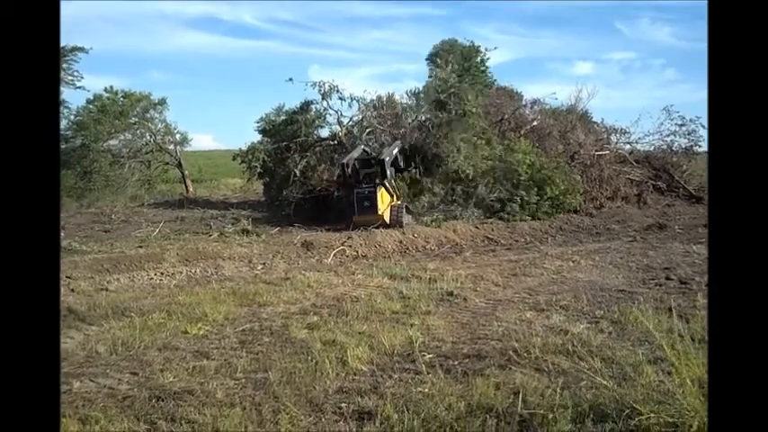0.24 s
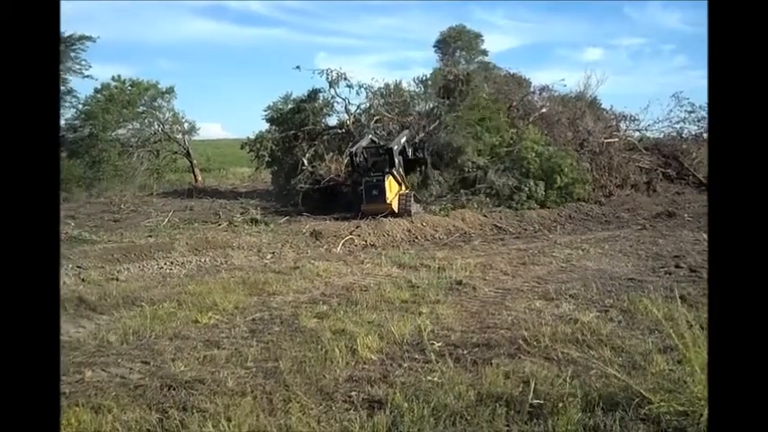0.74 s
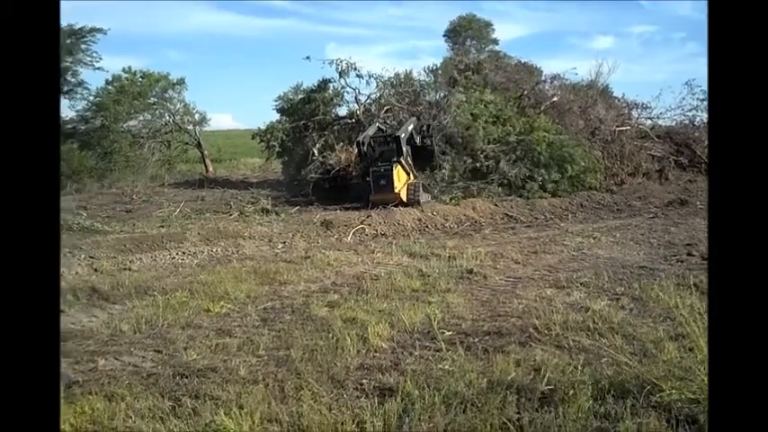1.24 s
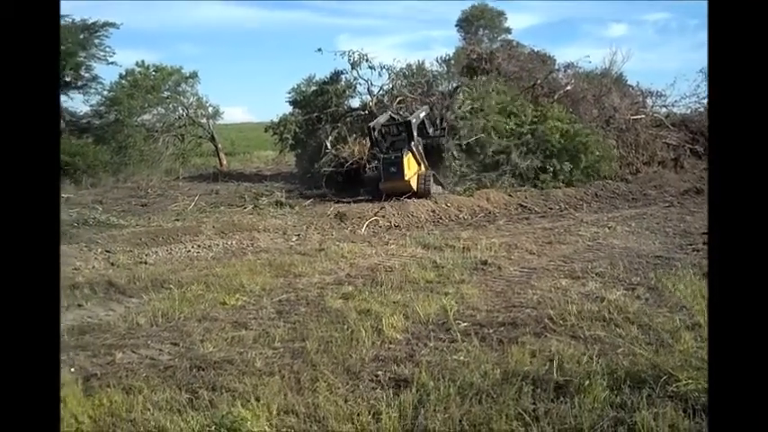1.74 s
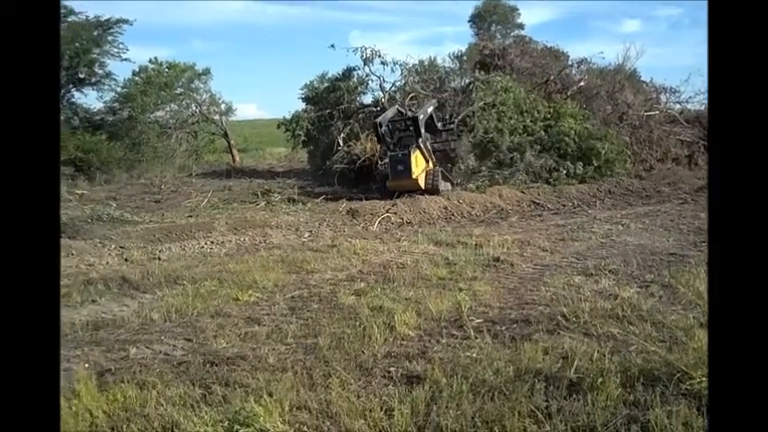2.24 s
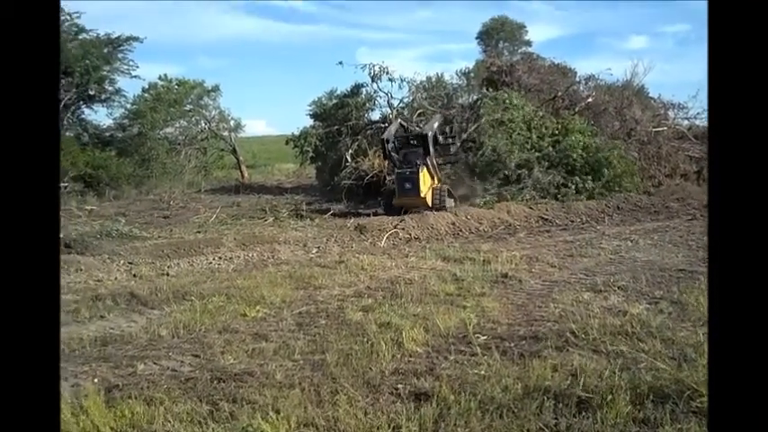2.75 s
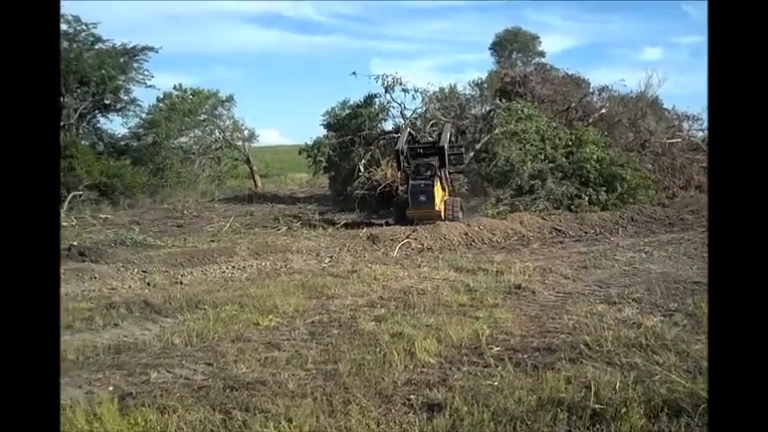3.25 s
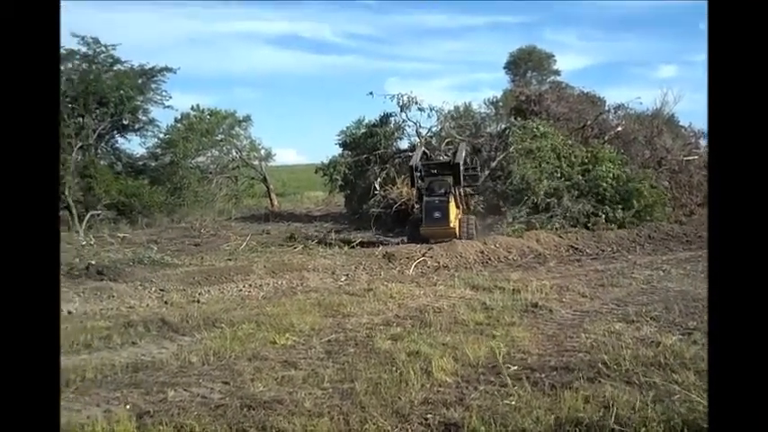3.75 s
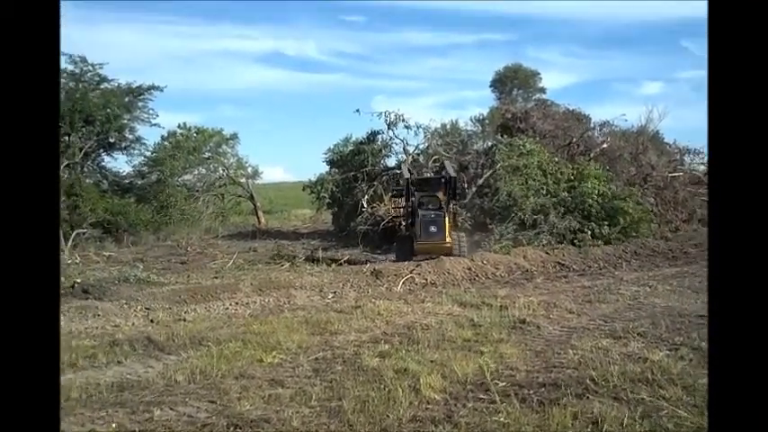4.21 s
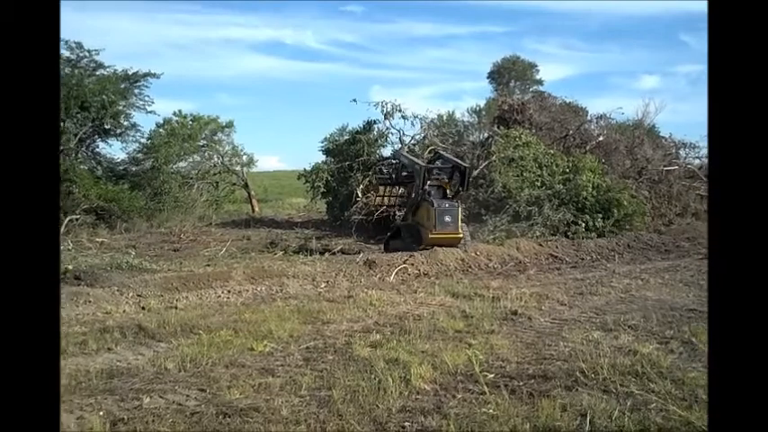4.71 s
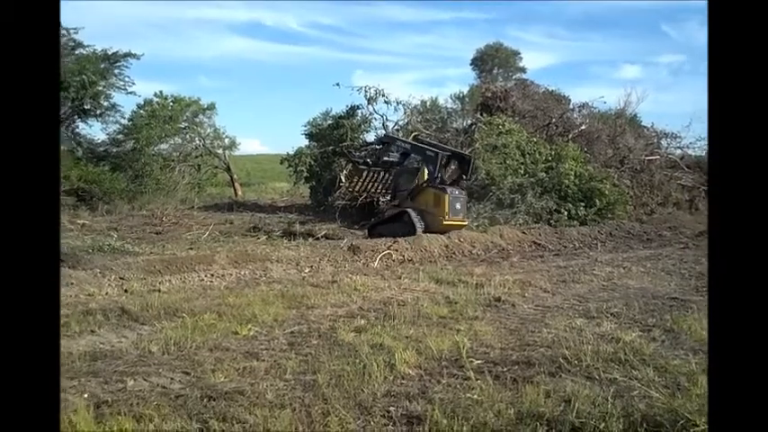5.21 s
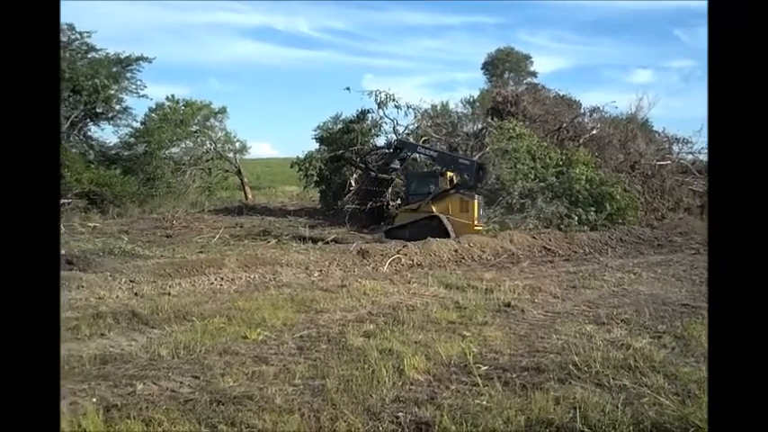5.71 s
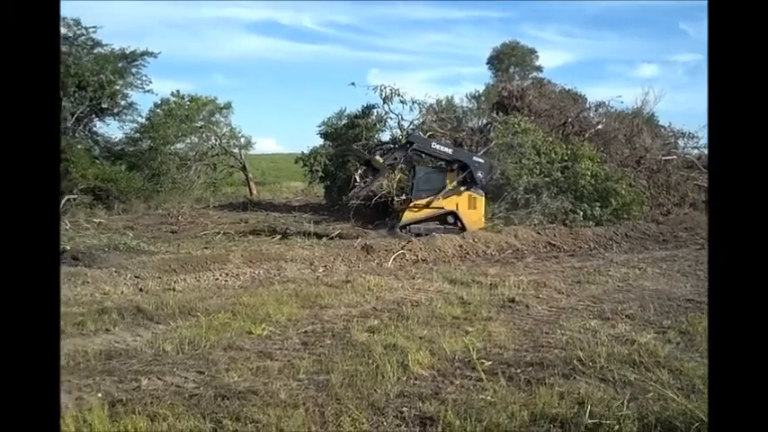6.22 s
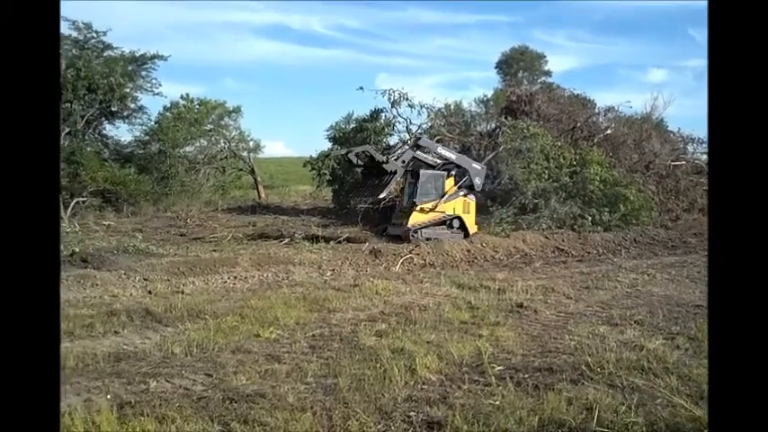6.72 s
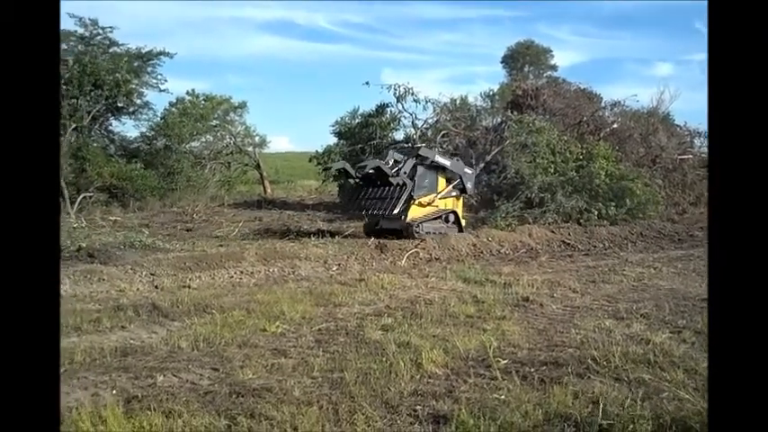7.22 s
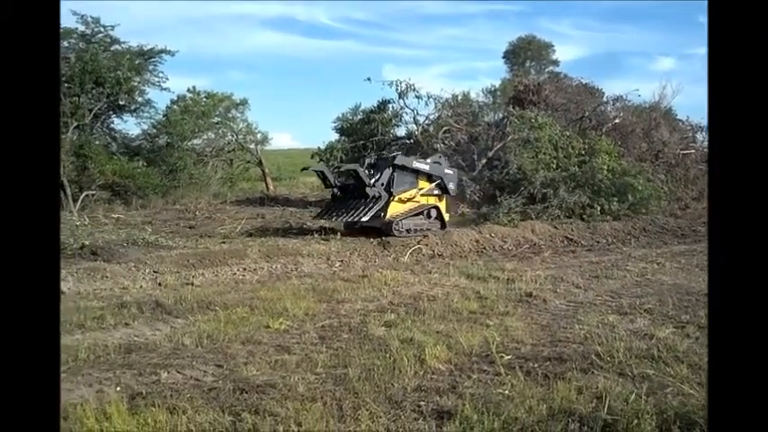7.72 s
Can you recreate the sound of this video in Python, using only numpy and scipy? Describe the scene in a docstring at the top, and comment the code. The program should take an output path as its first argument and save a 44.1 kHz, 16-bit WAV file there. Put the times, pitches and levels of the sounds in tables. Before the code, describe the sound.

Wind thumps the microphone while a distant tracked machine revs, growls and clatters beside brush, its bright roar dulling near the end as it turns.

```python
"""Diesel tracked loader at work beside a brush pile, some way off in an open field; it turns side-on.
Engine: exhaust orders follow a firing rate that sags and recovers; a coloured roar throbs with the firings.
Also: fan tones, ringing tracks, frame knocks, hydraulic whine, snapping twigs, thin turbo whistle.
Wind thuds in opposite polarity left and right, with brief clicks; heavier gusts duck the automatic gain.
The machine is widened by delay and phase turn, its bright roar also by diffuse echoes."""
import sys
import numpy as np
from scipy import signal
from scipy.fft import rfft, irfft
from scipy.io import wavfile
from scipy.ndimage import uniform_filter1d

SR = 44100
rng = np.random.default_rng(int(sys.argv[2]) if len(sys.argv) > 2 else 0)


def store_wav(level_fs):
    """Save 16-bit WAV to argv[1]."""
    pcm = np.round(np.clip(np.atleast_2d(level_fs), -1, 1) * 32767)
    wavfile.write(sys.argv[1], SR, pcm.T.astype(np.int16))


N = 351024
TIME = np.arange(N) / SR
FREQS = np.maximum(np.arange(N // 2 + 1) * SR / N, 1)

# wind strength, relative: t/s, level/dB
WIND = [(0, -38), (.9, -48), (1.8, -30.5), (2.35, -45.5), (3.9, -28), (4.7, -39), (5.1, -30), (6.1, -31),
        (6.6, -32), (7.7, -29)]
# strongest eddies: t/s, peak/dB, pitch f/Hz
BUFFETS = [(.026, -17, 193), (.132, -17.5, 164), (0.186, -21, 124), (0.21, -19, 177), (0.345, -21, 145),
           (0.369, -18, 150), (0.441, -19, 130), (0.5322, -4, 161), (0.651, -24, 150), (.932, -29, 150),
           (1.414, -22, 150), (1.728, -5, 148), (1.78, -4, 165), (1.868, -11, 210), (1.906, -5, 125),
           (1.959, -10.5, 149), (2.546, -10.5, 107), (2.691, -17, 140), (3.01, -12, 140), (3.19, -5.5, 109),
           (3.408, -5, 130), (3.506, -8, 115), (5.07, -3.5, 190), (5.261, -7, 128), (5.279, -7, 185),
           (5.51, -8, 150), (5.588, -15, 150), (5.999, -10, 129), (6.062, -6, 140), (6.121, -6, 180),
           (6.143, -5, 122), (6.279, 3.5, 145), (6.344, 1.5, 160), (6.38, -9, 185), (6.904, -14, 137),
           (7.159, -18, 140), (7.434, -18, 150), (7.598, -14, 190), (7.633, -14, 170), (7.926, -15, 150)]
# short windowed tones, clicks like handling taps early on, wind flutter later:
# t/s, envelope peak/dB, pitch f/Hz, length/s
SHORT_TONES = [(.026, -34, 800, 0.00077), (.130, -31.5, 1400, .0004), (.131, -21.5, 543, .0009),
               (.209, -34, 645, 0.00097), (0.371, -28, 500, 0.00073), (1.778, -10, 453, 0.0016),
               (1.905, -18, 430, 0.0012), (6.141, -10, 430, 0.0025), (6.279, -14, 446, 0.0019)]
# gusts that overload the input: t/s, peak/dB re full scale
GUSTS = [(1.76, 3), (1.93, 3), (3.216, 4.5), (3.539, 5.5), (5.3, 2), (6.025, 5), (6.17, 7), (6.309, 12.5)]
# stereo widening: f/Hz, left phase lead beyond the plain delay/rad, left minus right level/dB
STEREO = [(101, 2.01, 5), (174, 0.54, 6.5), (344, 0.094, 4.5), (491, 0.48, 4), (572, 2.45, 7.5),
          (616, 3.32, -1), (874, 4.14, 1), (1060, 4.08, 1), (1430, 3.46, 0), (1860, 2.64, -1.5),
          (2576, 3.32, -5.5), (3060, 2.95, 6.5), (4150, 3.25, 0.5), (16000, 3.16, -2.5)]
# branches giving way: t/s, level/dB, length/s
BRUSH = [(1.608, -30, 0.018), (5.76, -34.5, 0.036), (7.53, -58, .014)]
# turbo whistle: t/s, centre f/Hz, relative amplitude
TURBO = [(7.25, 14000, 0.05), (7.35, 14400, 1), (7.65, 14550, 1), (7.96, 15000, .7)]
# hydraulic whines as the arms move: t/s, level/dB, length/s, pitch f/Hz, glide/(Hz/s)
WHINES = [(7.359, -47, 0.079, 2100, -260), (7.852, -42, 0.046, 2050, -300)]
# grapple and chassis knocks: t/s, blow peak/dB, pitch f/Hz, rattle level re blow/dB, rattle decay/s
KNOCKS = [(2.008, -25, 1050, -3, .02), (3.327, -10, 1020, -12, .025), (5.776, -17.5, 1100, -2, .025),
          (7.254, -16.5, 1550, 1, .018), (7.858, -14.5, 1000, 1, .014)]
# steel frame modes: f/Hz, relative level/dB, t60/s
STEEL_MODES = [(870, -1, .04), (975, 10.5, .06), (1050, 12.5, 0.037), (1186, 6, 0.049), (1670, 4, 0.043),
               (1937, 7, 0.054), (2300, 8.5, 0.0039), (3650, -3.5, 0.0073), (4700, -3, .004)]
# fan hum: t/s, level re roar body curve/dB
FAN_HUM = [(0, -4), (2.1, -6.5), (3.4, -2.5), (4.1, -3.5), (5.9, -9.5), (6.7, -15.5), (7.96, -18)]
# fan tones following the hum: multiple of blade rate, level re hum/dB
FAN_BLADES = [(1, .5), (1.104, -13), (3, -12)]
# fan tones added once the machine is side-on: multiple of blade rate, level re roar body curve/dB
FAN_SIDE_ON = [(2, -19.5), (2.208, -16), (3.312, -15), (4, -18)]
# engine roar, relative: t/s, body level/dB, bright rasp level/dB
ROAR = [(0, -54, -64), (.4, -50, -55.5), (1, -45.5, -54.5), (1.6, -35.5, -43), (2.4, -37, -50),
        (3.1, -29, -38), (3.5, -31.5, -38.5), (3.85, -27, -33), (4.15, -31, -38.5), (4.35, -29, -36.5),
        (4.8, -26, -38.5), (5.1, -28, -37), (5.5, -31, -41.5), (5.95, -29.5, -38.5), (6.4, -36.5, -52),
        (6.75, -40, -54), (7.3, -40.5, -52), (7.96, -31, -49)]
# roar colour: f/Hz, relative level/dB
ROAR_COLOUR = [(35, -14.5), (130, -14), (250, 0.5), (430, -5), (545, -12.5), (720, -3), (1050, -2.5),
               (1450, -8), (1900, -2.5), (2450, -5), (3100, -13), (5200, -15), (6500, -21), (7700, -18),
               (11000, -32), (15500, -29)]
# engine-bay resonances: rear-on f/Hz, side-on f/Hz, width/Hz, rear-on lift/dB, side-on lift/dB
PANELS = [(850, 826, 170, 0.5, 2.5), (1410, 1320, 110, -2.5, -2), (1693, 1650, 190, 3.5, 0),
          (2600, 2260, 290, 1.5, -5), (3350, 3570, 285, 5.5, 5), (3680, 3870, 270, -6.5, -3.5),
          (4070, 4300, 260, 1.5, -4.5), (4330, 5140, 390, -7, -1), (4900, 4840, 400, 1, 5)]
# engine speed under load: t/s, firing rate f/Hz
ENGINE_SPEED = [(0, 66), (.33, 66), (.74, 88), (1.2, 92.3), (2.1, 83.6), (2.42, 84.6), (3.02, 78.2),
                (3.32, 88.8), (3.68, 86), (4.2, 92.6), (4.8, 85.3), (5.35, 86.5), (5.75, 77.3),
                (6.28, 81.3), (6.55, 80.5), (7.06, 100), (7.45, 96.4), (7.78, 101), (7.96, 99)]
# exhaust under load, relative: t/s, firing note level/dB, octave level/dB
EXHAUST = [(0, -75, -59), (.55, -52, -52), (1.5, -45, -43.5), (2.4, -49, -46), (3.1, -42, -37.5),
           (3.5, -39.5, -41), (4, -35, -32), (4.9, -38, -39), (5.4, -40.5, -44.5), (5.9, -42.5, -31),
           (6.4, -45, -35.5), (6.8, -43.5, -40), (7.7, -39.5, -36.5)]
# higher orders of the firing rate, among them the hydraulic pump's line at 3.6 times: multiple of firing rate,
# level re octave curve/dB
FIRING_ORDERS = [(1.2, -18), (1.4, -32), (1.6, -19), (2.4, -22), (2.8, -24), (3, -33), (3.6, -16.5),
                 (4, -24), (8.4, -15.5)]

STEREO_DELAY_S = .000363
# random lesser eddies; peak is relative to the WIND level
EDDIES_PER_S, EDDY_DB, EDDY_SPREAD_DB, EDDY_HZ = 6.0, 3.5, 2, 140
GUST_S, BASS_CUT_HZ, CUTOFF_HZ, RECOVERY_DB_PER_S = .024, 30, 15800, 11
TURN_AT_S, TURN_S, SIDE_ON_TONES_AT_S = 4.44, 0.3, 6.3
FAN_START_HZ, FAN_RUN_HZ, FAN_SPIN_UP_S, FAN_CREEP_HZ_PER_S = 232, 320.3, .47, 1.3
# the fan's octave beams from the rear grille
HUM_OCTAVE_DB, GRILLE_FACES_S, GRILLE_PASS_S, GRILLE_BEAM_DB = -13.5, 4.7, 0.31, 11
# ringing track links and pins; level is relative to the roar body curve
CLINKS_PER_S, CLINK_DB, CLINK_T60_S, CLINK_LOW_HZ, CLINK_HIGH_HZ = 70, -12, 0.25, 696, 2260
# dry link clatter inside the roar
LINKS_PER_S, LINK_SPREAD_DB, LINK_DECAY_S = 300, 2.0, .0005
# roar colour flicker: rms depth, width and length of a swell
FLICKER_DB, FLICKER_HZ, FLICKER_S = 1.1, 130, .035


def from_db(db):
    """Decibels to gain."""
    return np.exp(np.asarray(db) * (np.log(10) / 20))


def rms_one(x):
    """Scale to unit power."""
    return x / np.sqrt(np.mean(x ** 2) + 1e-20)


def sine(cycles_turned):
    """Unit sine from a phase in cycles."""
    return np.sin(2 * np.pi * cycles_turned)


def in_time(rows):
    """Table columns interpolated at every sample."""
    s, *columns = np.transpose(rows)
    return [np.interp(TIME, s, c) for c in columns]


def at_hz(rows, hz):
    """Table columns interpolated over log frequency."""
    f, *columns = np.transpose(rows)
    return [np.interp(np.log(hz), np.log(f), c) for c in columns]


def band(x, hz, kind, order=2):
    """Butterworth filter."""
    return signal.sosfilt(signal.butter(order, hz, kind, fs=SR, output="sos"), x + 1e-18)


def drift(rate_hz, step=40):
    """Slow random signal, rms 1: two-pole filtered noise, interpolated from a coarse grid."""
    r = np.exp(-2 * np.pi * rate_hz * step / SR)
    noise = rng.standard_normal(N // step + 2002)
    slow = signal.lfilter([1], [1, -2 * r, r * r], noise)[2000:]
    return np.interp(np.arange(N) / step, np.arange(len(slow)), rms_one(slow))


def ring(clicks, hz, t60_s):
    """Two-pole resonator: a unit click starts a decaying sine of height 1."""
    r = np.exp(-np.log(1000) / (t60_s * SR))
    w = 2 * np.pi * hz / SR
    return signal.lfilter([0, np.sin(w)], [1, -2 * r * np.cos(w), r * r], clicks + 1e-18)


def grains(per_s, spread_db):
    """Random clicks of uneven size and sign."""
    size_db = spread_db * np.minimum(rng.exponential(1, N), 4)
    sizes = from_db(size_db) * rng.choice([-1, 1], N)
    return sizes * (rng.random(N) < per_s / SR)


def cycles(hz, wobble):
    """Cycles turned so far; wobble is the rms fractional speed error."""
    return np.cumsum(hz * (1 + wobble * drift(8))) / SR


def turned(at_s, over_s, t):
    """Smooth step from 0 to 1."""
    return .5 + .5 * np.tanh((t - at_s) / over_s)


def bell(s, length_s):
    """Gaussian swell about one moment; peak 1."""
    return np.exp(-.5 * np.minimum(((TIME - s) / length_s) ** 2, 100))


def add_at(out, s, burst):
    """Mix a burst into out from time s."""
    i = int(s * SR)
    out[i:i + len(burst)] += burst[:N - i]


def eddy(age, hz, cut_hz):
    """One push and pull of pressure through a bass cut; peak 1."""
    swing = 2 * np.pi * hz * age
    thud = band(-swing * np.exp(-swing ** 2 / 2), cut_hz, "high")
    return thud / np.abs(thud).max()


def wind(rumble_db=-3.5, lumpy_db=4.0, cut_hz=105, top_hz=210, own_db=-9.5, thud_cut_hz=100):
    """Eddies push on one channel and pull on the other; a bass cut leaves a short thud of each."""
    strength_db = in_time(WIND)[0]
    level = from_db(strength_db + rumble_db + lumpy_db * drift(5.8))
    noises = []
    for white in rng.standard_normal((3, N)):
        cut = band(white, cut_hz, "high", order=4)
        noises.append(rms_one(band(cut, top_hz, "low", order=3)))
    shared, left, right = noises
    thuds, age = np.zeros(N), TIME[:SR // 20] - .01
    for s, db, hz in BUFFETS:
        add_at(thuds, s + age[0], from_db(db) * eddy(age, hz, thud_cut_hz))
    for s, db, hz, length_s in SHORT_TONES:
        add_at(thuds, s + age[0], from_db(db) * np.exp(-.5 * (age / length_s) ** 2) * sine(hz * age))
    # lesser eddies at random moments
    peak_db = strength_db + EDDY_DB + EDDY_SPREAD_DB * rng.standard_normal(N)
    lesser = (rng.random(N) < EDDIES_PER_S / SR) * rng.choice([-1, 1], N) * from_db(peak_db)
    thuds += signal.oaconvolve(lesser, eddy(age, EDDY_HZ, thud_cut_hz))[:N]
    opposed = (level * shared + thuds) * [[1], [-1]]
    return opposed + from_db(own_db) * level * np.array([left, right])


def gusts():
    """Slow pressure swells, too low to hear, alike on both channels."""
    return sum(from_db(db) * bell(s, GUST_S) for s, db in GUSTS)


def diffuse(x, level_db=-21.0, low_hz=1800, decay_s=0.0088):
    """Diffuse bright roar: decaying noise echoes, different left and right, widen the treble."""
    rasp, age = from_db(level_db) * band(x, low_hz, "high"), TIME[:SR // 10]
    echoes = rng.standard_normal((2, len(age))) * np.exp(-age / decay_s)
    return np.array([signal.oaconvolve(rasp, e / np.linalg.norm(e))[:N] for e in echoes])


def widened(x):
    """Stereo widening: delay, frequency-dependent phase turn and level difference, left against right."""
    turn_rad, balance_db = at_hz(STEREO, FREQS)
    phase_rad = turn_rad + 2 * np.pi * FREQS * STEREO_DELAY_S
    # half of each difference goes to either channel
    lead = np.exp(.5j * phase_rad) * from_db(balance_db / 2)
    eased = x * signal.windows.tukey(N, .002)
    return irfft(rfft(eased) * np.array([lead, 1 / lead]), N)


def brush(low_hz=950, high_hz=4500):
    """Dry twigs snap in bunches: dense random clicks, band-passed."""
    swell = sum(from_db(db) * bell(s, length_s) for s, db, length_s in BRUSH)
    snaps = band(grains(3700, 8.8), [low_hz, high_hz], "band")
    return swell * rms_one(band(snaps, 1500, "low", order=1))


def turbo(level_db=-63.0, width_hz=700, flutter_db=3.0):
    """Narrow-band noise whistle climbs unsteadily as the turbocharger spools up."""
    hz, swell = in_time(TURBO)
    breadth = rms_one(band(rng.standard_normal(N), width_hz / 2, "low"))
    level = from_db(level_db + flutter_db * drift(12))
    return level * swell * breadth * sine(np.cumsum(hz) / SR)


def hydraulics(wobble=.006, flutter_db=4.0):
    """Oil sings unevenly through a valve, its pitch sinking as the flow eases."""
    out = np.zeros(N)
    for s, db, length_s, hz, glide_hz_per_s in WHINES:
        level = from_db(db + flutter_db * drift(40)) * bell(s, length_s)
        out += level * sine(cycles(hz + glide_hz_per_s * (TIME - s), wobble))
    return np.sqrt(2) * out


def knocks(focus_db_per_octave=4.0, contact_low_hz=600, contact_high_hz=3000):
    """A blow rings the frame modes, favouring those near its pitch; loose steel rattles on after it."""
    out, age = np.zeros(N), TIME[:SR // 4]
    contact = band(signal.unit_impulse(len(age)), [contact_low_hz, contact_high_hz], "band")
    for s, db, pitch_hz, rattle_db, decay_s in KNOCKS:
        blow = rattle = 0
        for hz, mode_db, t60_s in STEEL_MODES:
            gain = from_db(mode_db - focus_db_per_octave * abs(np.log2(hz / pitch_hz)))
            envelope = np.exp(-age / decay_s) * (1 - np.exp(-age / 0.0016))
            chatter = band(rng.standard_normal(len(age)), 610, "high") * envelope
            blow = blow + gain * rms_one(ring(contact, hz, t60_s))
            rattle = rattle + gain * rms_one(ring(chatter, hz, t60_s))
        hit = blow / np.abs(blow).max() + from_db(rattle_db) * rattle / np.abs(rattle).max()
        add_at(out, s, from_db(db) * hit)
    return out


def tracks(count=20, spread_db=5.0):
    """Links and pins strike at random, each ringing at a pitch of its own."""
    clicks, dealt = grains(CLINKS_PER_S, spread_db), rng.integers(0, count, N)
    pitches_hz = np.geomspace(CLINK_LOW_HZ, CLINK_HIGH_HZ, count) * rng.uniform(.98, 1.02, count)
    rings = np.zeros(N)
    for k, hz in enumerate(pitches_hz):
        gain = from_db(at_hz(ROAR_COLOUR, hz)[0])
        rings += gain * ring(clicks * (dealt == k), hz, CLINK_T60_S)
    return from_db(in_time(ROAR)[0] + CLINK_DB) * rms_one(rings)


def fan(flutter_db=1.6):
    """Blade tones of a hydraulically driven fan: quick spin-up, then a slow creep, whatever the engine does."""
    spin_up_hz = (FAN_RUN_HZ - FAN_START_HZ) * np.exp(-TIME / FAN_SPIN_UP_S)
    passes = cycles(FAN_RUN_HZ + FAN_CREEP_HZ_PER_S * TIME - spin_up_hz, wobble=0.00403)
    body_db = in_time(ROAR)[0]
    hum_db = body_db + in_time(FAN_HUM)[0]
    hum, side_on = np.zeros(N), np.zeros(N)
    for multiple, db in FAN_BLADES:
        hum += from_db(hum_db + db + flutter_db * drift(24.0)) * sine(multiple * passes)
    # the octave swells as the rear grille swings past the listener
    octave_db = hum_db + HUM_OCTAVE_DB + GRILLE_BEAM_DB * bell(GRILLE_FACES_S, GRILLE_PASS_S)
    octave = from_db(octave_db + flutter_db * drift(15)) * sine(2 * passes)
    for multiple, db in FAN_SIDE_ON:
        side_on += from_db(body_db + db + 1.6 * flutter_db * drift(25)) * sine(multiple * passes)
    return np.sqrt(2) * (hum + octave + turned(SIDE_ON_TONES_AT_S, TURN_S, TIME) * side_on)


def panels(x, size=1024):
    """Engine-bay resonances glide from rear-on to side-on pitch; narrow bands of colour flicker."""
    f, t, frames = signal.stft(x, SR, nperseg=size)
    side = turned(TURN_AT_S, TURN_S, t)
    lift_db = 0
    for rear_hz, side_hz, width_hz, rear_db, side_db in PANELS:
        centre_hz = rear_hz + (side_hz - rear_hz) * side
        peak_db = rear_db + (side_db - rear_db) * side
        lift_db = lift_db + peak_db / (1 + (2 * (f[:, None] - centre_hz) / width_hz) ** 2)
    swells = uniform_filter1d(rng.standard_normal(frames.shape), round(FLICKER_HZ / f[1]), axis=0)
    swells = rms_one(uniform_filter1d(swells, round(FLICKER_S / t[1]), axis=1))
    coloured = frames * from_db(lift_db + FLICKER_DB * swells)
    return signal.istft(coloured, SR, nperseg=size)[1][:N]


def combustion(firing, decay_s=0.016, uneven=0.3, cylinders=5):
    """Each cylinder knocks the block with a short noise ring of its own."""
    at = np.flatnonzero(np.diff(np.floor(firing)))
    age, out = TIME[:SR // 20], np.zeros(N)
    for cylinder in range(cylinders):
        blows, own = np.zeros(N), at[cylinder::cylinders]
        blows[own] = 1 + uneven * rng.standard_normal(len(own))
        block_ring = rng.standard_normal(len(age)) * np.exp(-age / decay_s)
        out += signal.oaconvolve(blows, block_ring)[:N]
    return rms_one(out)


def roar(firing, knock_db=-4.0, clatter_db=-9.5, throb=0.14, body_db=4.5, rasp_db=9.0, low_db=-4.5,
         patchy_db=0.5, knock_top_hz=6000):
    """Diesel knock, throbbing air rush and track clatter, coloured by panels and ground."""
    rush = rng.standard_normal(N) * (1 + throb * np.cos(2 * np.pi * firing))
    link = rng.standard_normal(SR // 100) * np.exp(-TIME[:SR // 100] / LINK_DECAY_S)
    clatter = rms_one(signal.oaconvolve(grains(LINKS_PER_S, LINK_SPREAD_DB), link)[:N])
    impacts = from_db(knock_db) * combustion(firing) + from_db(clatter_db) * clatter
    drive = rush + band(impacts, knock_top_hz, "low")
    colour = rfft(panels(drive)) * from_db(at_hz(ROAR_COLOUR, FREQS)[0])
    body, rasp = in_time(ROAR)
    # treble is shaded sooner than body as the engine bay turns away
    above, below = 1 / (1 + (1800 / FREQS) ** 4), 1 / (1 + (FREQS / 500) ** 6)
    bright = irfft(colour * above, N) * from_db(rasp + rasp_db + patchy_db * drift(25))
    middle = irfft(colour * (1 - above - below), N) * from_db(body + body_db + patchy_db * drift(71))
    # lows bend round the machine and change less
    low = irfft(colour * below, N) * from_db(0.86 * body + low_db + patchy_db * drift(20.0))
    return (bright + middle + low) / np.std(irfft(colour, N))


def exhaust(firing, note_db=4.0, octave_db=1.1, flutter_db=1.0):
    """The muffler leaves the firing note, its octave and a few weak orders; the hydraulic pump adds a line of
    its own."""
    note_curve_db, octave_curve_db = in_time(EXHAUST)
    note = from_db(note_curve_db + note_db + flutter_db * drift(12)) * sine(firing)
    upper = from_db(octave_db + flutter_db * drift(7)) * sine(2 * firing)
    for multiple, db in FIRING_ORDERS:
        upper += from_db(db + 1.7 * drift(23)) * sine(multiple * firing + rng.random())
    return np.sqrt(2) * (note + from_db(octave_curve_db) * upper)


def scene():
    """Loader in the field, wind at the microphone."""
    left, right = wind()
    buffeting = np.array([left, np.interp(TIME - STEREO_DELAY_S, TIME, right)])
    firing = cycles(in_time(ENGINE_SPEED)[0], wobble=.003)
    engine = roar(firing)
    loader = brush() + turbo() + hydraulics() + knocks() + tracks() + fan() + engine + exhaust(firing)
    return buffeting + gusts() + diffuse(engine) + widened(loader)


def control_gain(x):
    """Smoothed pressure over full scale cuts the gain at once; it recovers at a steady dB rate."""
    pressure = np.abs(uniform_filter1d(x.mean(axis=0), size=256))
    over_db = 20 * np.log10(np.maximum(pressure, 1))
    recovered_db = RECOVERY_DB_PER_S * TIME
    return from_db(recovered_db - np.maximum.accumulate(over_db + recovered_db))


def record(dry):
    """Gain is set from unfiltered pressure; a bass cut removes the gusts, a steep low-pass the top."""
    ducked = band(dry, BASS_CUT_HZ, "high", order=8) * control_gain(dry)
    return signal.sosfilt(signal.ellip(10, .1, 80, CUTOFF_HZ, fs=SR, output="sos"), ducked)


dry = scene()
out = record(dry)
store_wav(out)
```